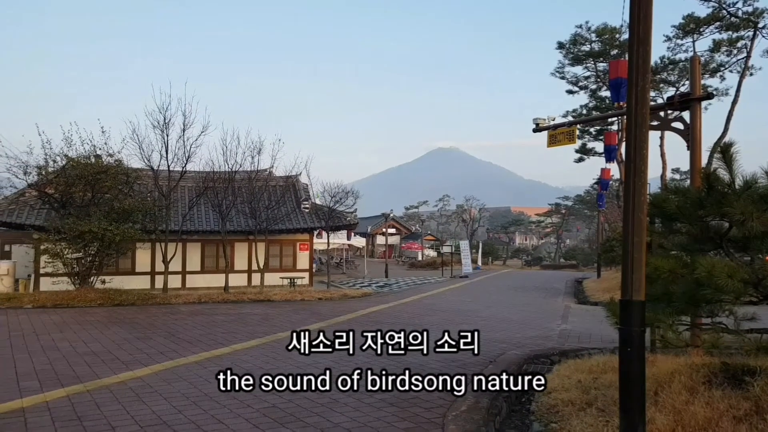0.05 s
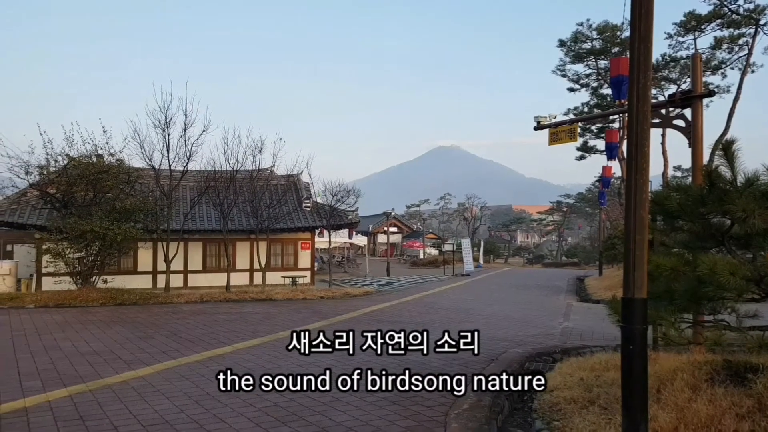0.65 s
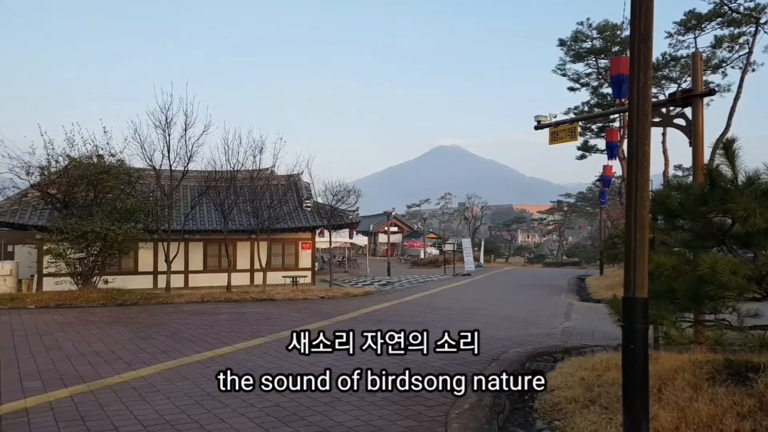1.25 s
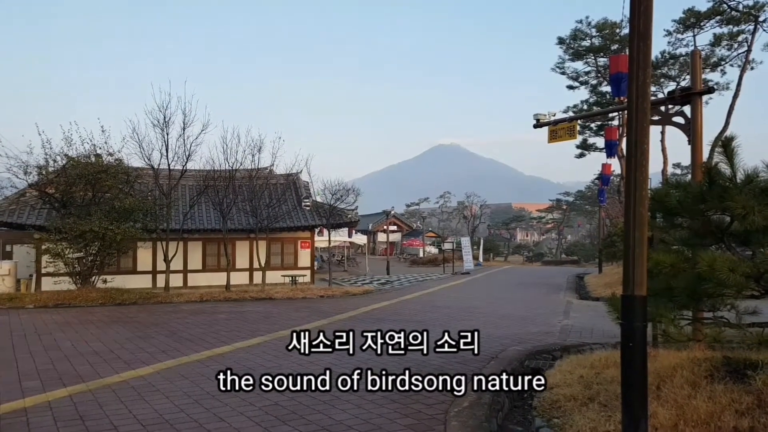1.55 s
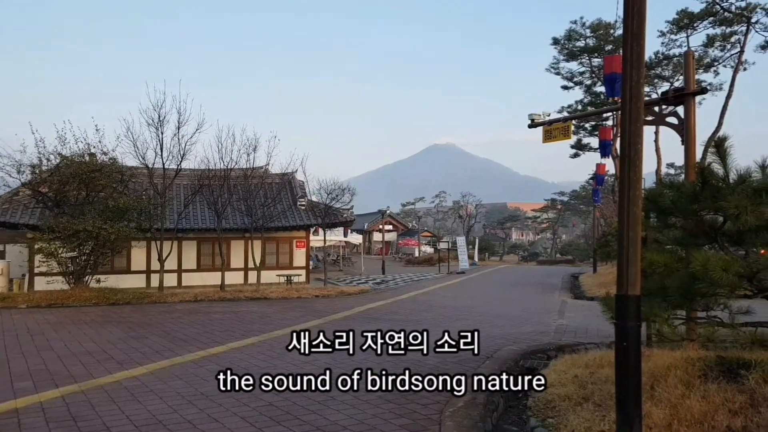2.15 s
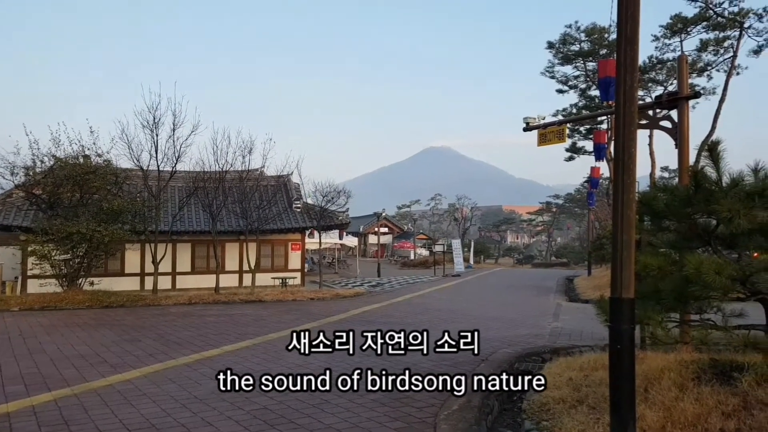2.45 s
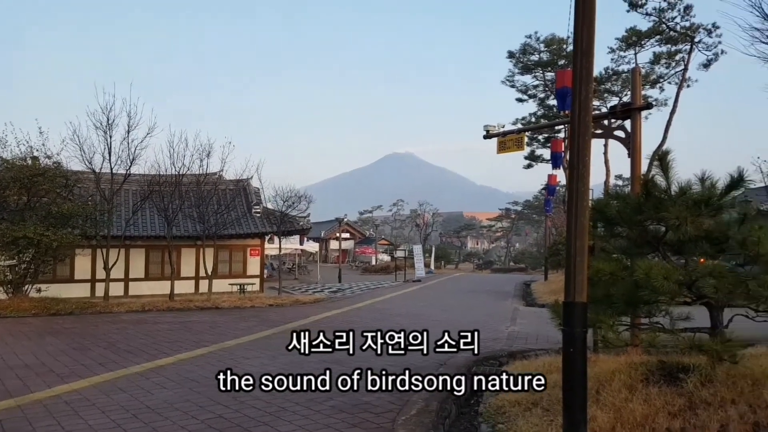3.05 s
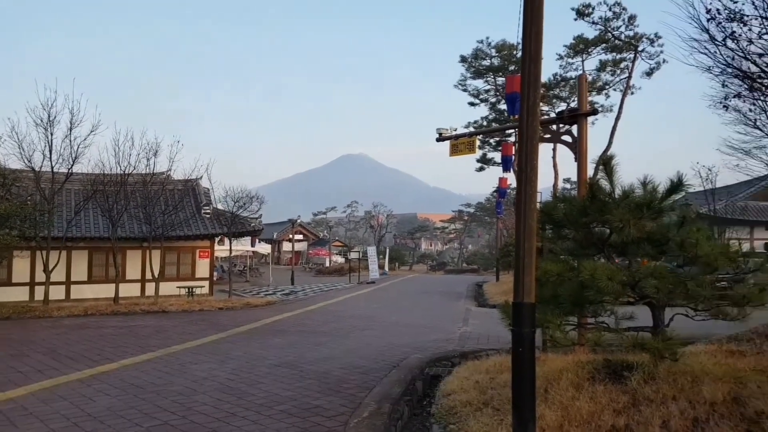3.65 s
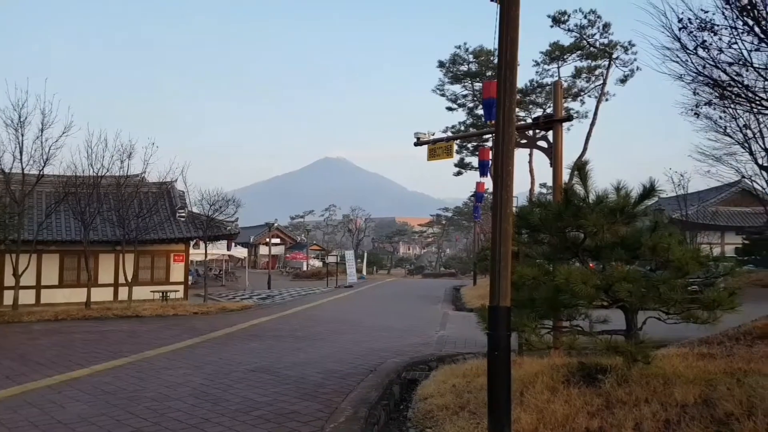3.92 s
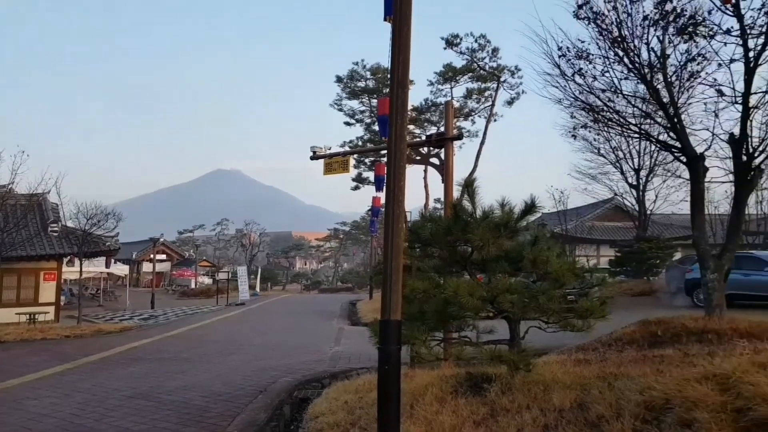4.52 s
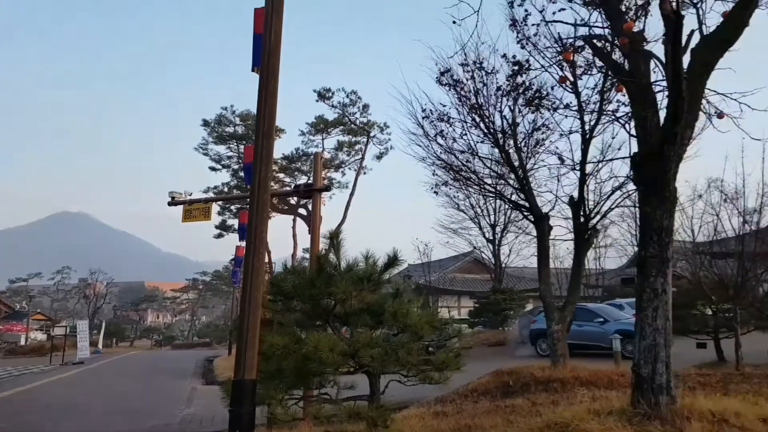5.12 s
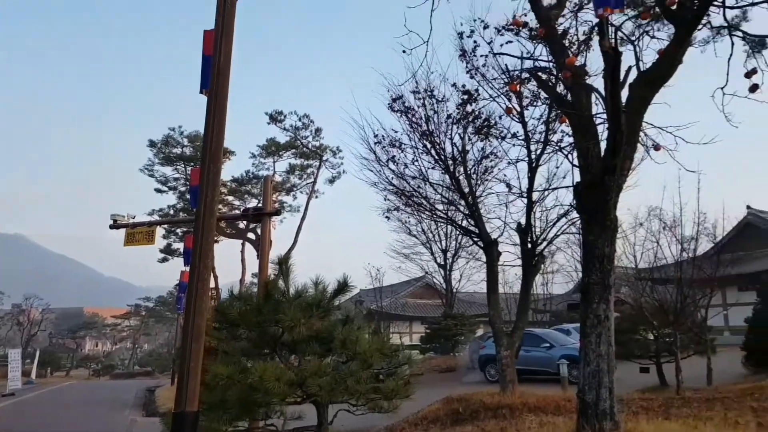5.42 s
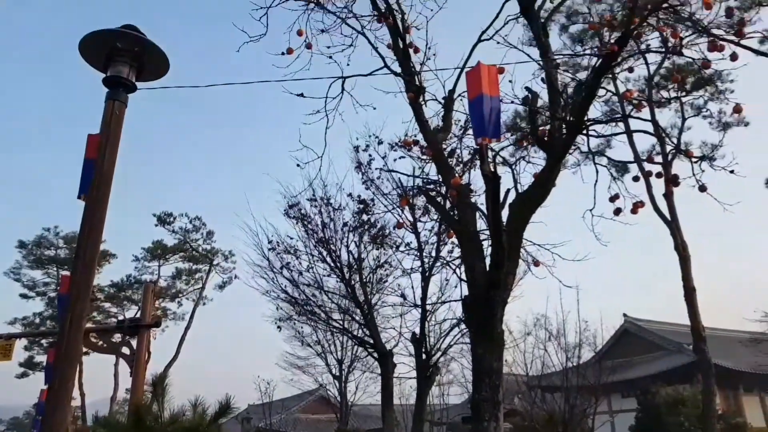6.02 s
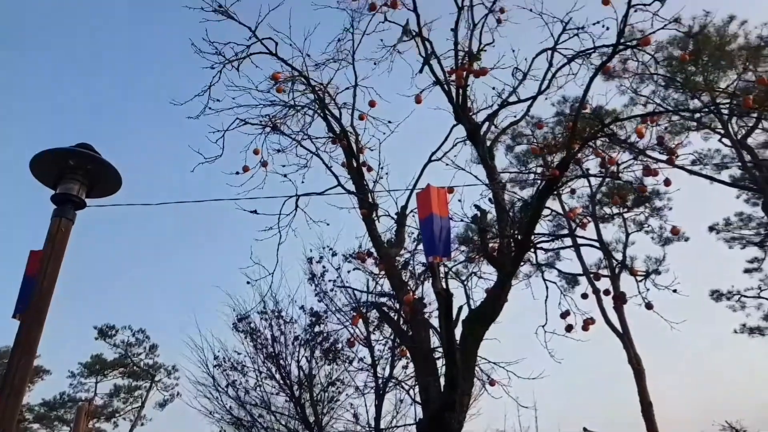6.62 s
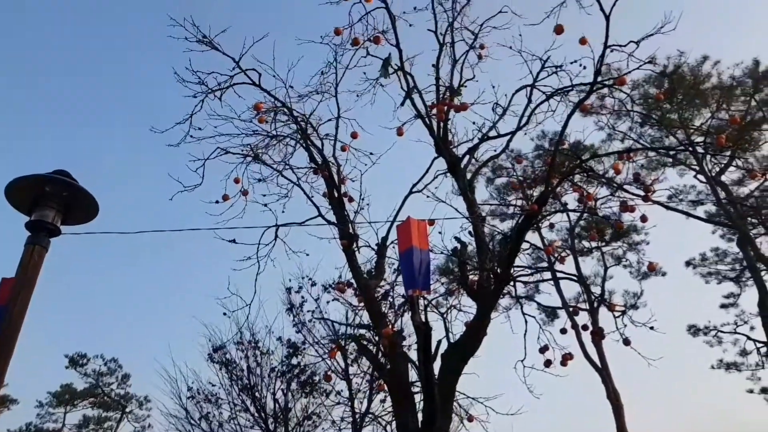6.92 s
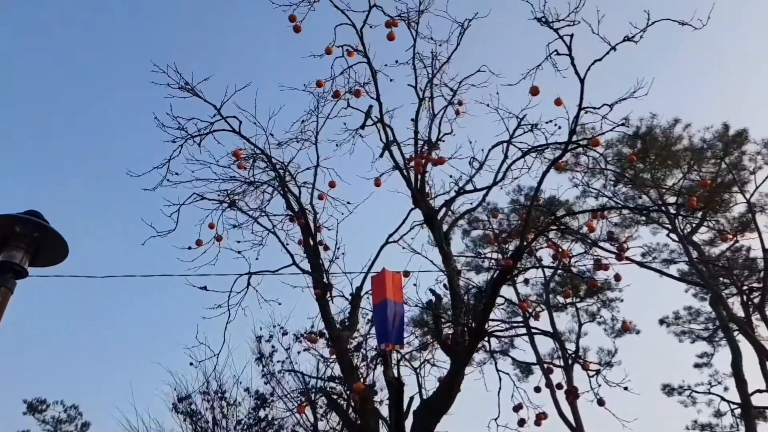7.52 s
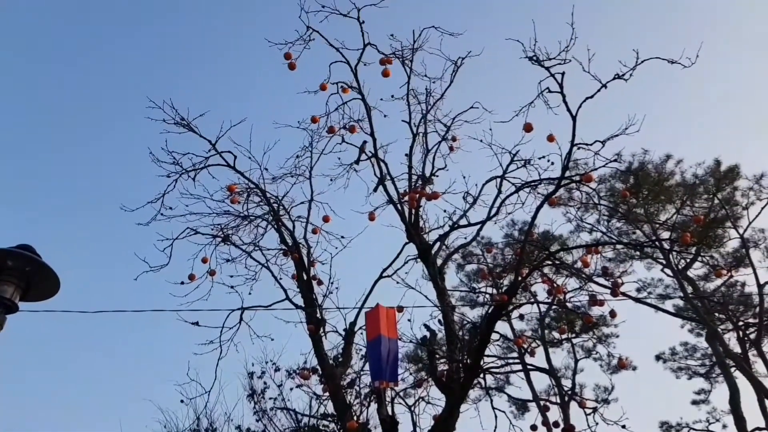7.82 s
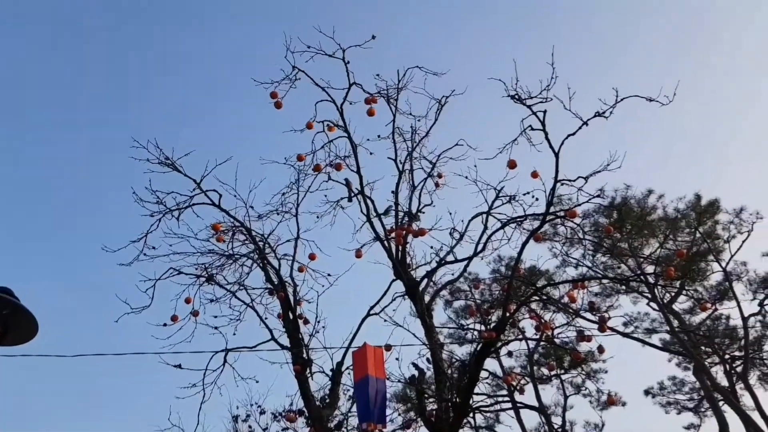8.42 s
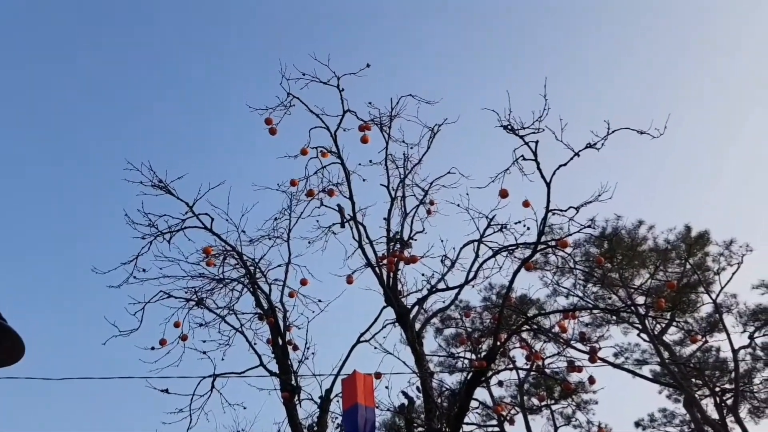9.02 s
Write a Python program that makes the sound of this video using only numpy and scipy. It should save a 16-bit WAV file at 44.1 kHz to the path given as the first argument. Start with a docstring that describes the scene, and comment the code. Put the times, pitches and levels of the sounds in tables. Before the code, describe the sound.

Birds give harsh, wavering screeches and short yelps outdoors while a distant car passes from left to right over a low town rumble.

```python
"""Over the low rumble of a town, a car drones some way off to the left, and bulbuls screech on the right.
Each call is a harmonic glide with a muted fundamental: a short yelp, or a squeal that breaks into a
fluttering drawl. The car slows; thin whistles and two distant yelps follow. Near 5.5 s its tyres sing
in front; then the engine revs up, slightly left of centre, as the tyre noise drifts right and more
screeches come from the trees ahead. The scene is heard through the two ports of a phone."""
import sys
import numpy as np
from scipy import signal
from scipy.fft import rfft, irfft, next_fast_len
from scipy.io import wavfile
from scipy.ndimage import uniform_filter1d, map_coordinates

SR = 44100
rng = np.random.default_rng(int(sys.argv[2]) if len(sys.argv) > 2 else 0)


def wav_record(signal):
    """Record a signal, one row per channel, as 16-bit PCM in the file named by sys.argv[1]."""
    frames = np.transpose(np.atleast_2d(signal))
    bounded = np.clip(frames, -1, 1)
    # unit amplitude maps onto the largest positive 16-bit level
    quanta = np.round(bounded * 32767).astype(np.int16)
    wavfile.write(sys.argv[1], SR, quanta)


N = 408366
T = np.arange(N) / SR
BIN_HZ = np.arange(N // 2 + 1) * SR / N


def undb(db):
    """Decibels to gain."""
    return 10 ** (np.asarray(db) / 20)


def curves(table):
    """Automation: each column of a table, joined by straight lines in time."""
    times, *columns = np.transpose(table)
    return [np.interp(T, times, column) for column in columns]


def swell(peak_s, half_s, db):
    """A bell-shaped fade up to a peak and down again."""
    return undb(db) * np.exp(-.5 * ((T - peak_s) / half_s) ** 2)


def progress(t, start, end):
    """A ramp from 0 to 1 between two times."""
    return np.clip((t - start) / max(end - start, 1 / SR), 0, 1)


def noise(points):
    """Noise of rms 1, shaped by (frequency [Hz], level [dB]) points and rolled off beyond them."""
    hz, db = np.transpose(points)
    f = np.maximum(BIN_HZ, 1)
    gain = undb(np.interp(np.log(f), np.log(hz), db))
    roll_off = np.minimum(1, hz[-1] / f) ** 2 * np.minimum(1, f / hz[0]) ** 2
    x = irfft(rfft(rng.standard_normal(N)) * gain * roll_off, N)
    return x / x.std()


def wobble(hz, width_hz, size):
    """Random modulation of spread 1 around a rate."""
    n = next_fast_len(size + SR // 4)
    f = np.arange(n // 2 + 1) * SR / n
    x = irfft(rfft(rng.standard_normal(n)) * np.exp(-.5 * ((f - hz) / width_hz) ** 2), n)
    return x[:size] / x.std()


def ports(x, lag_ms, pan_db):
    """A sound reaches the left port later by lag_ms and louder by pan_db than the right."""
    i, half_lag = np.arange(len(x)), lag_ms * SR / 2000
    return np.array([map_coordinates(x, [i - side * half_lag], order=3) * undb(side * pan_db / 2)
                     for side in (1, -1)])


def diffuse(points, left_db, spacing_ms=.78):
    """Noise from all around: alike at both ports in the bass, unrelated in the treble."""
    alike = np.sinc(2 * BIN_HZ * spacing_ms / 1000)
    mid, side = (irfft(rfft(noise(points)) * np.sqrt((1 + sign * alike) / 2), N) for sign in (1, -1))
    return np.array([(mid + side) * undb(left_db / 2), (mid - side) * undb(-left_db / 2)])


def add(out, start, x):
    """Mix a stereo sound in at a time."""
    i = int(start * SR)
    out[:, i:i + x.shape[1]] += x[:, :N - i]


def town(rumble_db=-41.5, ebb_db_per_s=.42):
    """Far traffic rumbles and slowly ebbs; a faint high hiss with one brief swish lies above it."""
    # spectra of the low bed and the high hiss: (frequency [Hz], density [dB])
    rumble_spectrum = [(20, -21), (31, -6), (40, -34), (50, -1.5), (62, 2), (73, -7), (84, -4), (94, -3.5),
                       (108, -8), (121, -9), (140, -14.5), (280, -14.5), (400, -22), (1000, -19),
                       (2000, -31.5), (3200, -56.5)]
    high_hiss_spectrum = [(2000, -19), (4000, 1), (6000, -3), (9000, -2), (12500, -1.5), (16000, -2.5)]
    # level of the faint high hiss, swelling and sinking: (time [s], level [dB])
    high_hiss_levels = [(0, -69), (2.2, -68), (2.5, -78), (3.8, -71.5), (5.5, -78), (6.2, -68.5),
                        (8.5, -76.5)]
    rumble = diffuse(rumble_spectrum, 1.4)
    rumble *= undb(rumble_db - ebb_db_per_s * T + 1.04 * wobble(3.4, 9.3, N))
    swish = swell(peak_s=4.26, half_s=.034, db=-63)
    high_hiss = diffuse(high_hiss_spectrum, 1.0)
    high_hiss *= undb(curves(high_hiss_levels)[0] + 1.4 * wobble(6.6, 13, N)) + swish
    return rumble + high_hiss


def tyres(pan_db=7.0, scatter_db=-6):
    """Tyres roar and hiss from left to right; the tread sings in front and houses scatter the hiss."""
    # rolling noise: (time [s], roar [dB], hiss [dB])
    tyre_levels = [(0.0, -42.5, -48.5), (1.7, -46.5, -57), (2.2, -48.5, -53.5), (3.7, -47.5, -50.5),
                   (4.5, -52.5, -59), (6.3, -57, -61), (7.35, -57, -61.5), (8.07, -58.5, -57),
                   (9.26, -59, -60.5)]
    # the tyres' path across the stereo field: (time [s], lag of the left port [ms])
    bearing = [(0, -0.47), (3.2, -.51), (4.9, -0.32), (5.3, -0.26), (5.7, .12), (6.2, 0.31), (7.8, 0.44),
               (9.26, 0.52)]
    # spectra of the three tyre layers: (frequency [Hz], density [dB])
    roar_spectrum = [(120, -2.5), (250, -8), (500, -1.5), (900, -0.5), (1150, -5), (1450, -19), (2200, -53)]
    hiss_spectrum = [(800, -21), (1250, -0.5), (1600, 2.5), (2100, -4), (2500, -8), (3000, -15.5),
                     (4000, -28), (7000, -35)]
    tread_spectrum = [(600, -22), (850, -3), (980, 0), (1100, -6), (1350, -24)]
    roar_db, hiss_db = curves(tyre_levels)
    surface_db = 1.2 * wobble(3, 7.7, N)
    roar = undb(roar_db + surface_db) * noise(roar_spectrum)
    hiss_gain = undb(hiss_db + surface_db)
    hiss = hiss_gain * noise(hiss_spectrum)
    tread = swell(peak_s=5.55, half_s=.5, db=-57.5) * noise(tread_spectrum)
    scattered = hiss_gain * diffuse(hiss_spectrum, 2.4) * undb(scatter_db)
    return ports(roar + hiss + tread, curves(bearing)[0], pan_db) + scattered


def engine(pipe_hz=96, pipe_width_hz=4, pipe_db=16, load_db_per_octave=10, pan_db=2.3):
    """Firing orders drone; each booms as it passes through the exhaust's resonance."""
    # the revs: (time [s], firing rate [Hz])
    revs = [(0, 62.1), (.5, 52.96), (1.45, 54), (2.05, 46.02), (2.7, 48.5), (5.8, 43), (6.3, 53.96),
            (7.65, 84.05), (9.26, 86.5)]
    # the drone's rise and fall: (time [s], level [dB])
    drone_levels = [(0, -44), (.35, -35), (1.3, -33), (2.1, -43.5), (2.7, -41.5), (3.4, -53), (5.6, -51),
                    (6.4, -45), (7, -42.5), (7.7, -42.5), (8.05, -52), (8.5, -44), (9.26, -41.5)]
    # firing orders: (multiple of the firing rate, relative level [dB])
    orders = [(1, -1.5), (2, -13.5), (3, -16)]
    hz, level_db = curves(revs)[0], curves(drone_levels)[0]
    phase = 2 * np.pi * np.cumsum(hz * (1 + .0093 * wobble(4.8, 3.28, N))) / SR
    drone = 0
    for k, order_db in orders:
        boom_db = pipe_db * np.exp(-.5 * ((k * hz - pipe_hz) / pipe_width_hz) ** 2)
        rev_db = load_db_per_octave * np.log2(hz / hz.max()) * (k > 1)  # overtones grow with the revs
        waver_db = .68 * wobble(3.0, 4.4, N)
        drone += undb(level_db + order_db + boom_db + rev_db + waver_db) * np.sin(k * phase)
    return ports(np.sqrt(2) * drone, 0, pan_db)


def surroundings(direct, echo_send, near_db=-5.2, near_t60=.16, far_db=-24, far_t60=.95, far_hz=4800,
                 wall_s=.027, wall_db=-2):
    """Branches and ground scatter the calls; a wall slaps back and houses return a faint, dull tail."""
    t = np.arange(SR) / SR
    sparse_taps = rng.standard_normal((2, SR)) * (rng.random((2, SR)) < .03)
    near = sparse_taps * undb(-60 * t / near_t60) * (t > .001)
    far = rng.standard_normal((2, SR)) * undb(-60 * t / far_t60) * (t > wall_s)
    near, far = (r / np.sqrt(np.sum(r ** 2, axis=1, keepdims=True)) for r in (near, far))
    far[:, int(wall_s * SR)] += undb(wall_db)
    far = signal.sosfilt(signal.butter(2, far_hz, fs=SR, output="sos"), far)
    scatter = undb(near_db) * signal.fftconvolve(direct, near, axes=1)
    echo = undb(far_db) * signal.fftconvolve(echo_send, far, axes=1)
    return (scatter + echo)[:, :N]


def whistle(length, first_hz, last_hz, waver=.013):
    """A near-pure note that slides and levels off."""
    u = np.linspace(0, 1, int(length * SR))
    slide_hz = first_hz + (last_hz - first_hz) * np.sin(np.pi / 2 * u)
    hz = slide_hz * (1 + waver * wobble(80, 60, len(u)))
    return np.sqrt(2 * np.abs(np.sin(np.pi * u))) * np.sin(2 * np.pi * np.cumsum(hz) / SR)


def onset_bend(t, crest_s, scoop=.36, scoop_s=.011, rise=.05, late_crest_s=.08):
    """Opening pitch factor: a quick scoop, then a rounded rise; a later crest starts lower."""
    below = scoop * np.exp(-t / scoop_s) + rise * np.maximum(1 - t / crest_s, 0) ** 2
    return 1 - below * (crest_s / late_crest_s) ** 2


def clearing(t, clear_s=.02):
    """Runs from 0 to 1 as the opening rasp clears into a squeal."""
    return 1 - np.exp(-(t / clear_s) ** 2)


def syrinx(t, glide_hz, purity, db, bright_db, voice, flutter_hz=165, flutter_depth=.029, tremor_db=3,
           shimmer_db=3.1, hoarse_db=-13, rasp_s=.022, release_s=.01):
    """The bird's voice: harmonics glide, flutter shakes pitch and level, and both ends rasp."""
    # throat and beak colour, from the fundamental up: (harmonic level [dB])
    throat = [-44, 0, -10, -13, -14.5, -14.5, -15.5, -18.5, -18]
    # windpipe resonances: (centre [Hz], width [Hz], boost [dB])
    windpipe = [(5300, 520, 11), (12400, 720, 11.5)]
    n = len(t)
    attack_s, drawl_flutter, odd_db, beak_hz = voice
    resonances = windpipe + [(beak_hz, 620, 6.5)]  # each call tunes the beak with its gape
    glide_hz = uniform_filter1d(glide_hz, size=300) * (1 + .002 * wobble(8, 6, n))
    # a pure squeal hardly flutters and loses its odd harmonics
    flutter = drawl_flutter + (.06 - drawl_flutter) * purity
    odd_db = odd_db - 16 * purity
    bright_db = bright_db - 6 * (1 - clearing(t))  # the upper harmonics arrive last
    remaining_s = t[-1] - t
    shake = flutter * np.tanh(2 * wobble(flutter_hz, 60, n))
    edges = np.exp(-np.minimum(t, remaining_s) / rasp_s)
    rasp = flutter * (.009 + .075 * edges) * wobble(410, 280, n)
    waver = .0062 * wobble(40.5, 27, n)
    hz = glide_hz * (1 + flutter_depth * shake + rasp + waver)
    phase = 2 * np.pi * np.cumsum(hz) / SR
    tone = 0
    for k, throat_db in enumerate(throat, 1):
        # each harmonic swells and fades as it slides through the resonances
        resonance_db = sum(boost * np.exp(-.5 * ((k * glide_hz - centre) / width) ** 2)
                           for centre, width, boost in resonances)
        colour_db = throat_db + resonance_db + odd_db * (k % 2) + bright_db * np.log2(max(k / 2, 1))
        fray = 1 + flutter * undb(hoarse_db) * wobble(130, 240, n)  # turbulent air
        tone += undb(colour_db + shimmer_db * wobble(4.7, 22, n)) * fray * np.sin(k * phase)
    envelope = (1 - np.exp(-t / attack_s)) ** 2 * (1 - np.exp(-remaining_s / release_s))
    effort_db = 1.1 * wobble(9, 7, n)
    return np.sqrt(2) * tone * envelope * undb(db + tremor_db * shake + effort_db)


def yelp(length, crest_s, crest_hz, db, bright_db, purity, voice, tumble=.25, tumble_db=-6):
    """One short arch of pitch; as it tumbles the squeal grows rough and weak."""
    t = np.arange(int(length * SR)) / SR
    fall = progress(t, crest_s, length) ** 2
    hz = crest_hz * onset_bend(t, crest_s) * (1 - tumble * fall)
    purity = purity * clearing(t) * (1 - fall) ** 2
    return syrinx(t, hz, purity, db + tumble_db * fall, bright_db, voice)


def screech(length, times, pitches, levels_db, brights_db, fade_db_per_s, voice,
            crossfade_s=.014, sag=.08, sag_s=.05, drop=.3, drop_s=.009):
    """A squeal swings down from its crest, breaks into a drawl, climbs to a held note and drops away."""
    t = np.arange(int(length * SR)) / SR
    crest_s, dip_s, hold_s, break_s = times
    crest_hz, dip_hz, hold_hz = pitches
    swing_hz = (crest_hz - dip_hz) * np.cos(np.pi / 2 * progress(t, crest_s, dip_s)) ** 2
    climb_hz = (hold_hz - dip_hz) * progress(t, dip_s, hold_s)
    ending = 1 - sag * np.exp((t - length) / sag_s) - drop * np.exp((t - length) / drop_s)
    hz = (dip_hz + swing_hz + climb_hz) * onset_bend(t, crest_s) * ending
    drawl = .5 + .5 * np.tanh((t - break_s) / (2 * crossfade_s))
    db = np.interp(drawl, [0, 1], levels_db) - fade_db_per_s * np.maximum(t - break_s, 0)
    purity = clearing(t) * (1 - drawl)
    bright_db = np.interp(1 - purity, [0, 1], brights_db)
    return syrinx(t, hz, purity, db, bright_db, voice)


def birds(call_db=-1.5):
    """Calls from the trees and their echo send; the distant birds feed more of it to the houses."""
    # where the birds sit, by name: (lag of the left port [ms], left minus right [dB], echo send [dB])
    perches = {"right": (.39, 1.5, 3), "half right": (.265, 1.8, 3), "far right": (.42, 4.2, 13),
               "ahead": (.025, 5.2, 2), "far ahead": (.03, 1.7, 21.5)}
    # long screeches: (perch, start [s], length [s], (crest, dip, hold, break [s after the start]),
    #   (crest, dip, hold [Hz]), (squeal, drawl level [dB]), (squeal, drawl brightness [dB/octave]),
    #   drawl fade [dB/s], voice: (attack [s], flutter [0-1], odd harmonics [dB], beak resonance [Hz]))
    screeches = [ ("right", .393, .462, (.085, .22, .29, .145), (1945, 1840, 1890), (-37, -42.5), (5, -.5),
                 7, (.0035, .68, 2.5, 9450)), ("half right", .8, .87, (.02, .44, .63, 0.016),
                 (1800, 1680, 2060), (-46.5, -45.8), (0, .3), 0, (.02, .45, .5, 8600)),
                 ("half right", 1.608, .532, (.027, .082, .19, 0), (1810, 1670, 1860), (-47, -46.5),
                 (0, -0.87), -10, (.01, .42, 2.5, 9100)), ("ahead", 6.218, .44, (.028, .1, .36, 0.097),
                 (1875, 1600, 1925), (-39.5, -44.5), (1.5, 2.5), 34, (.022, .95, -3, 6650)),
                 ("ahead", 6.842, .456, (.045, .14, .32, 0.12), (1945, 1515, 1775), (-31.5, -48), (2, .6),
                 -3, (.03, .5, 0, 8600)), ("ahead", 9.058, .4, (.025, .115, .25, 0.13), (1863, 1497, 1750),
                 (-41.5, -49), (-2, -1), 0, (.014, .45, 0, 6600))]
    # short yelps: (perch, start [s], length [s], crest [s after the start], crest [Hz], level [dB],
    #   brightness [dB/octave], purity [0-1], voice as above)
    yelps = [ ("right", 0.2033, .14, .077, 1985, -34.5, 1.5, 1, (.005, .9, -.5, 11200)),
             ("half right", 1.17, .09, .022, 1920, -45.5, 5, .7, (.009, .35, 5, 9400)),
             ("half right", 1.85, .1, .03, 1990, -37, -8, .9, (.014, .4, 0, 8500)),
             ("far right", 3.782, .14, .02, 1985, -44.5, -9, .3, (.012, .55, -7, 7300)),
             ("far right", 4.888, .1, .042, 1945, -48, -12, .5, (.02, .4, -4, 8600)),
             ("far ahead", 8.05, .135, .03, 1850, -68, -8, .3, (.016, .7, -5, 6700))]
    # thin slurred whistles: (start [s], length [s], first pitch [Hz], last pitch [Hz], level [dB])
    whistles = [(3.615, 0.16, 3250, 4700, -71), (4.03, 0.13, 3740, 5810, -64.5),
                (4.312, 0.042, 3210, 3070, -67), (6.801, 0.078, 3500, 4940, -65)]
    direct, echo_send = np.zeros((2, 2, N))
    for sing, cues in ((screech, screeches), (yelp, yelps)):
        for perch, start, *shape in cues:
            lag_ms, pan_db, echo_db = perches[perch]
            call = ports(sing(*shape) * undb(call_db), lag_ms, pan_db)
            add(direct, start, call)
            add(echo_send, start, call * undb(echo_db))
    for start, length, first_hz, last_hz, db in whistles:
        note = whistle(length, first_hz, last_hz) * undb(db)
        add(direct, start, ports(note, lag_ms=.288, pan_db=2.7))
    return direct, echo_send


def scene():
    """Birds and their echoes over the car and the town."""
    direct, echo_send = birds()
    return direct + surroundings(direct, echo_send) + tyres() + engine() + town()


def record(dry, shelf_hz=6500, right_minus_left_db=3.5, top_hz=15650):
    """The right port is brighter than the left; the phone cuts the top."""
    shelf_db = right_minus_left_db / (1 + (shelf_hz / np.maximum(BIN_HZ, 1)) ** 10)
    coloured = irfft(rfft(dry) * undb(np.outer([-.5, .5], shelf_db)), N)
    return signal.sosfilt(signal.ellip(12, .1, 80, top_hz, fs=SR, output="sos"), coloured)


dry = scene()
out = record(dry)
wav_record(out)
```